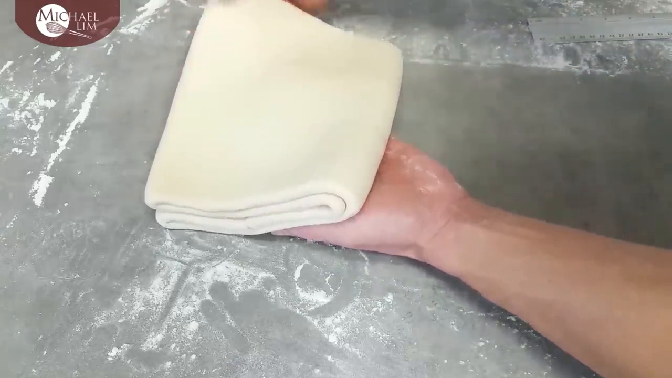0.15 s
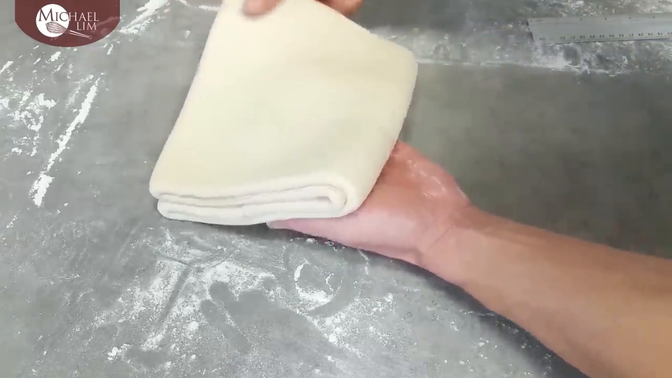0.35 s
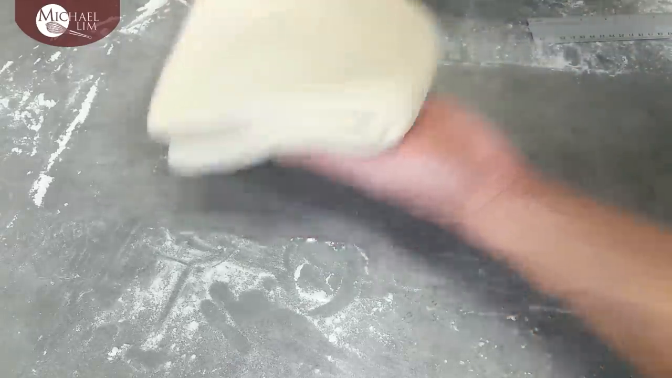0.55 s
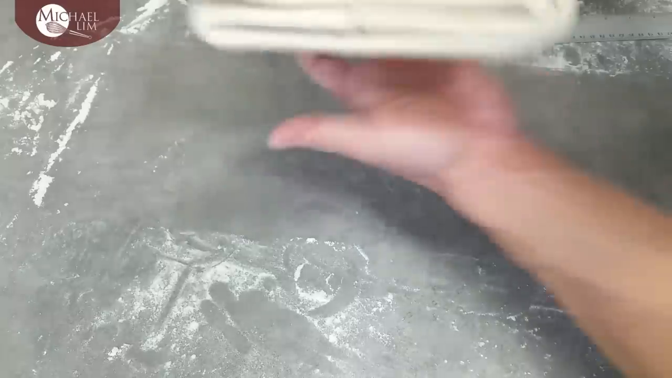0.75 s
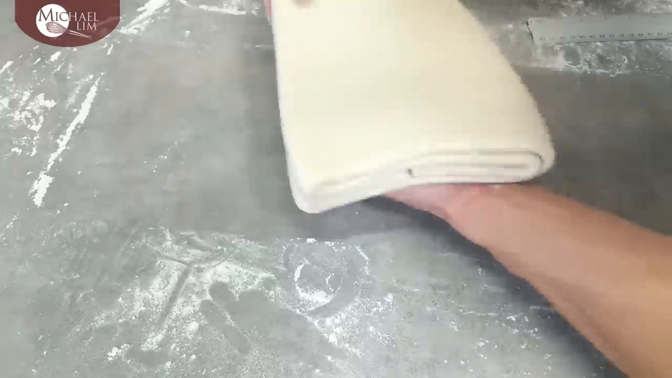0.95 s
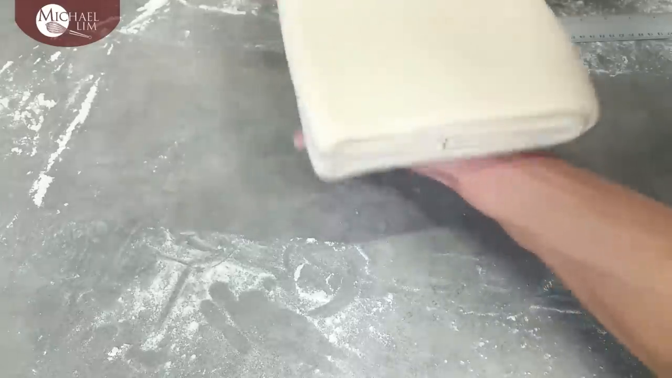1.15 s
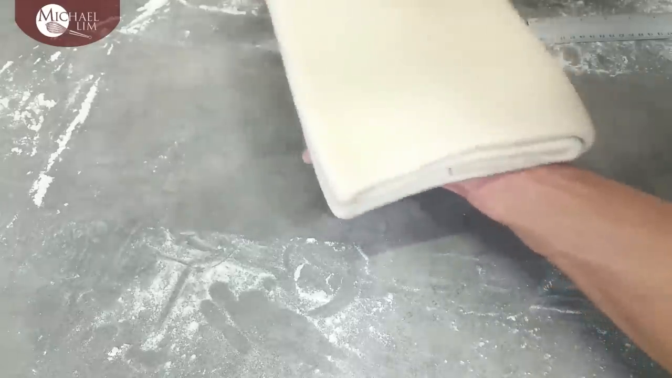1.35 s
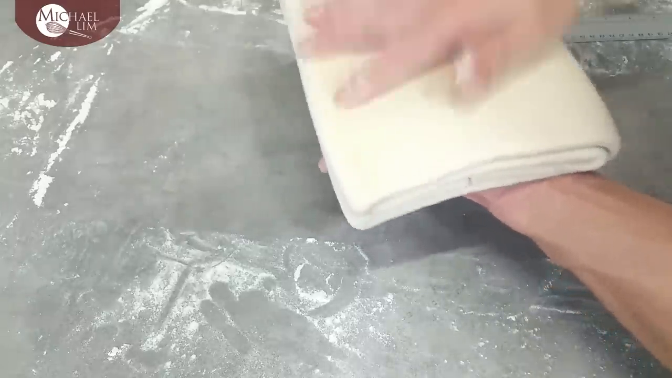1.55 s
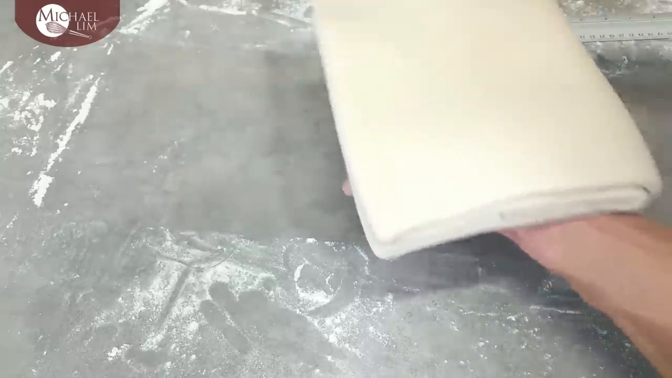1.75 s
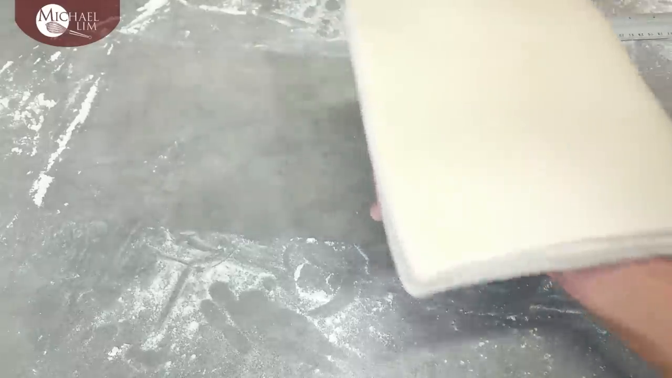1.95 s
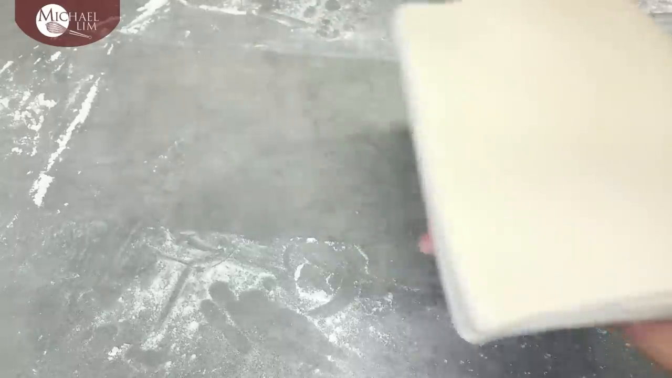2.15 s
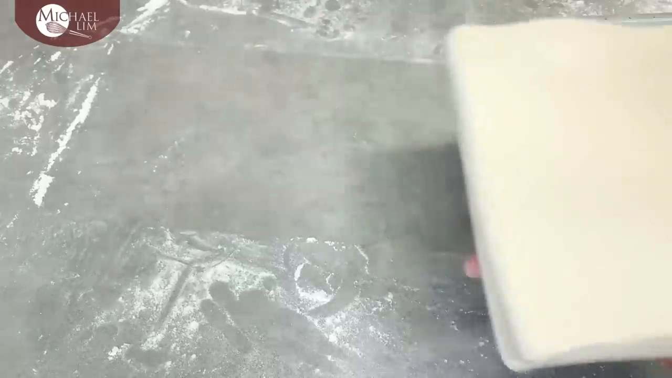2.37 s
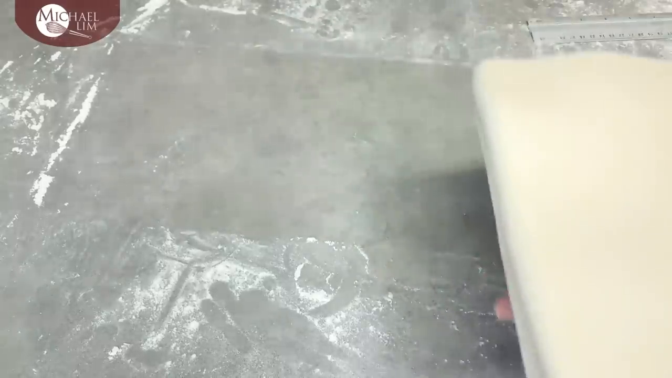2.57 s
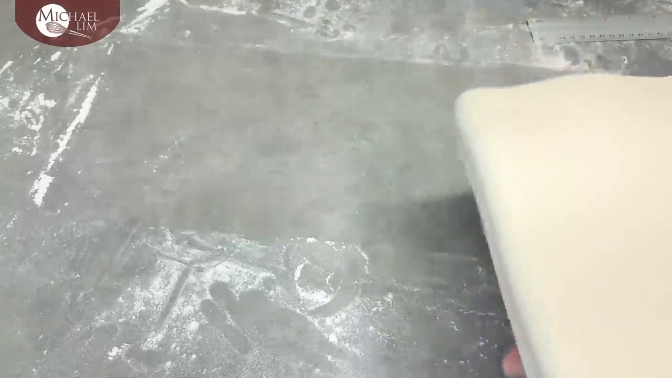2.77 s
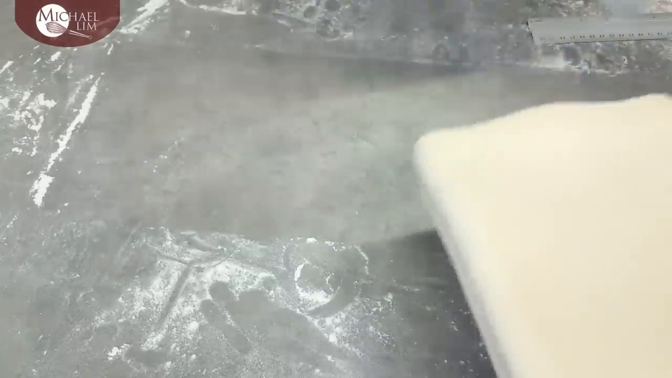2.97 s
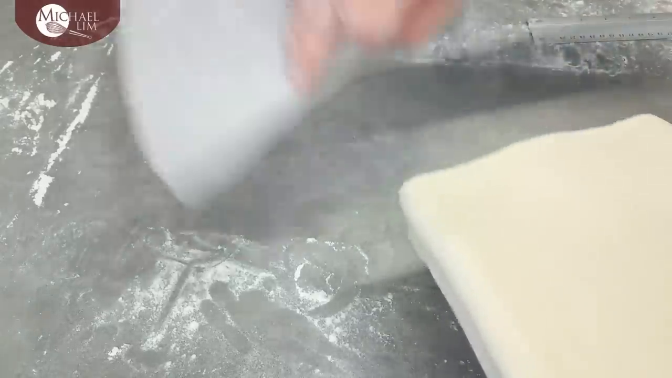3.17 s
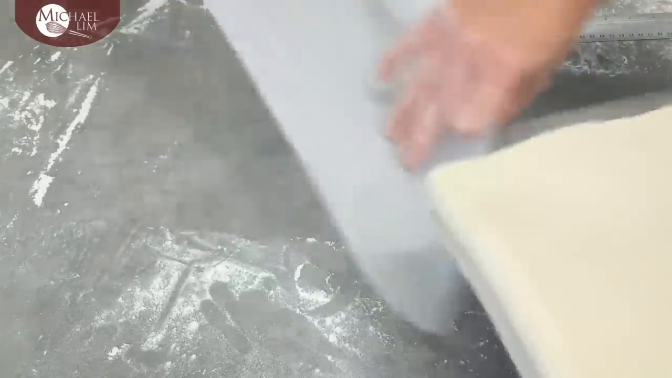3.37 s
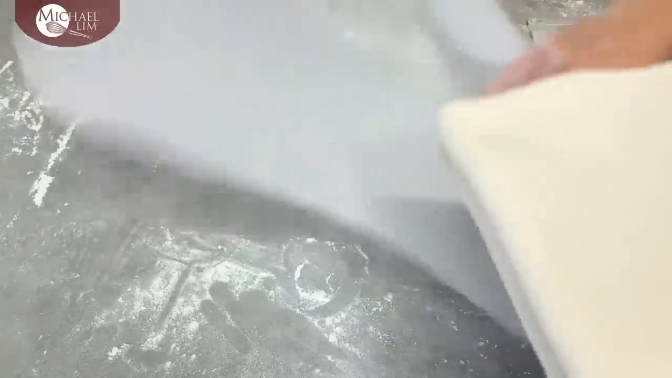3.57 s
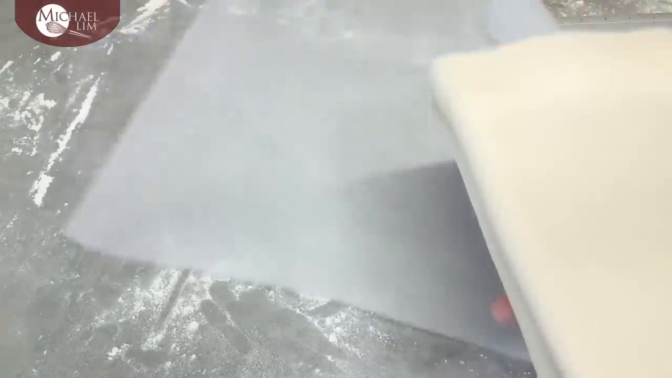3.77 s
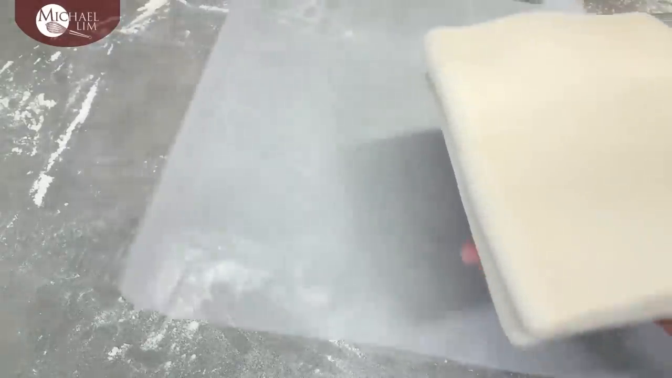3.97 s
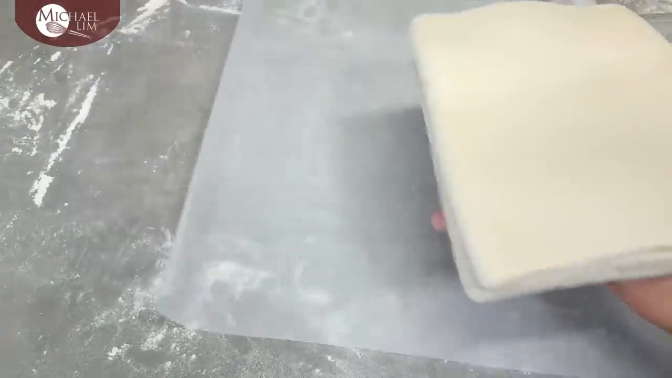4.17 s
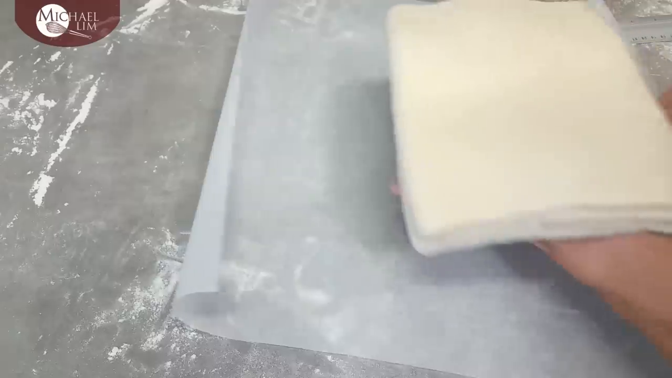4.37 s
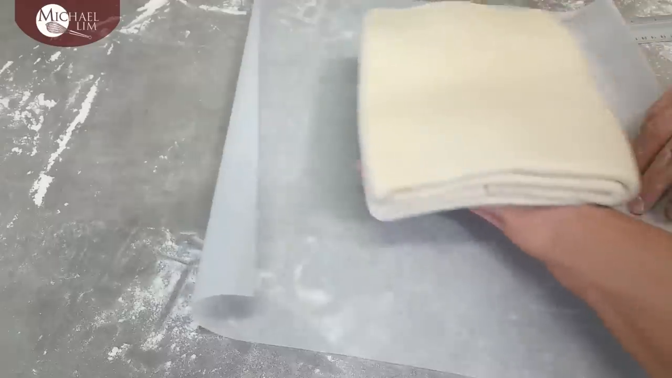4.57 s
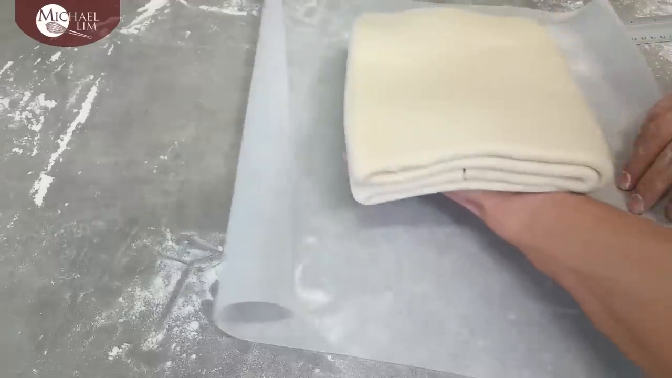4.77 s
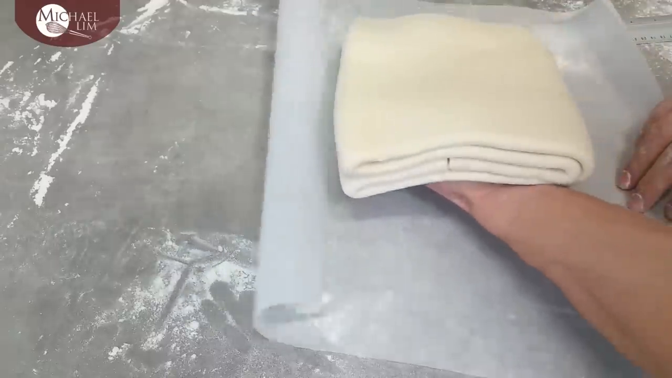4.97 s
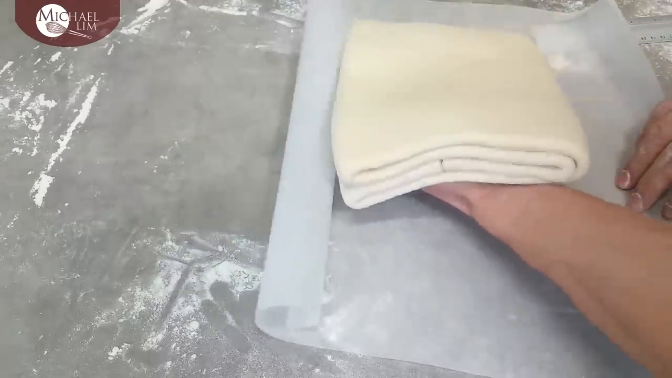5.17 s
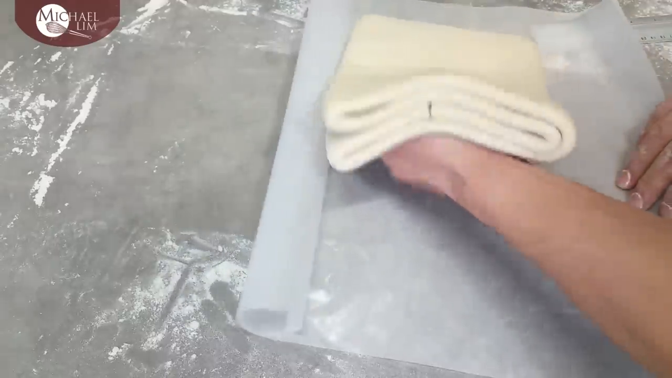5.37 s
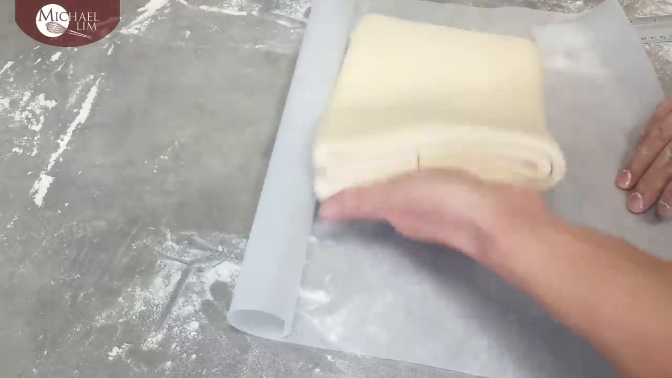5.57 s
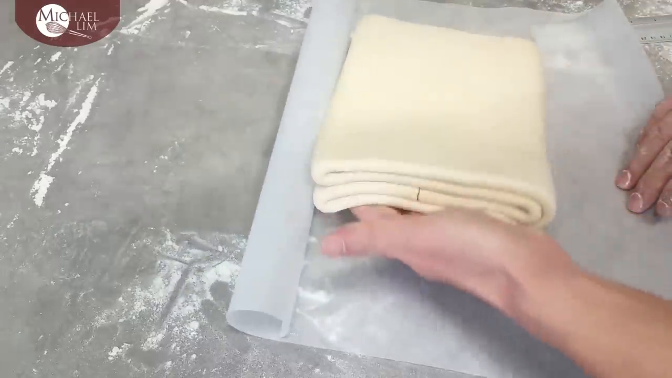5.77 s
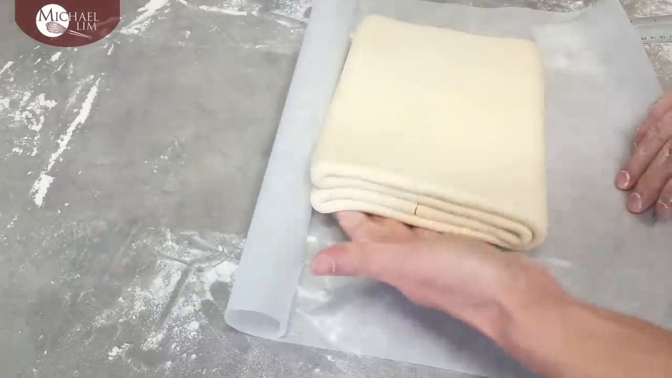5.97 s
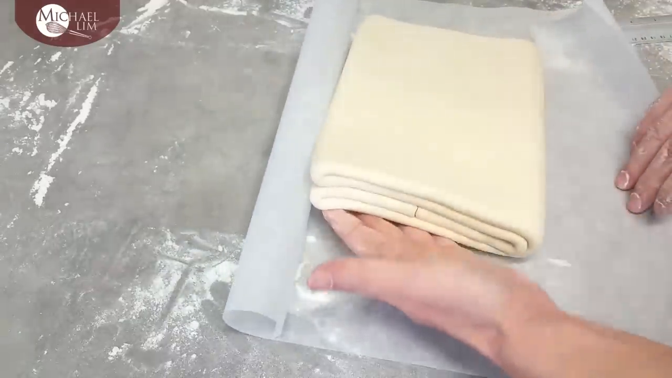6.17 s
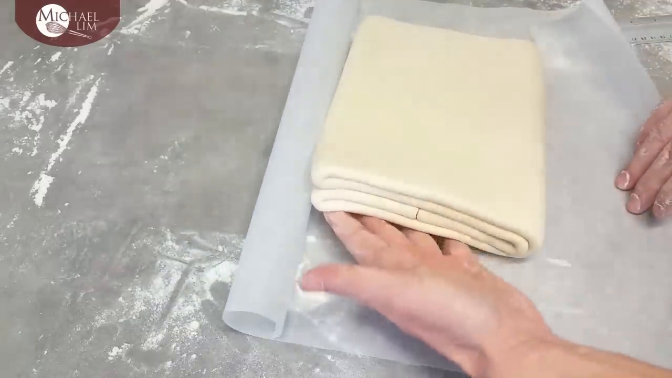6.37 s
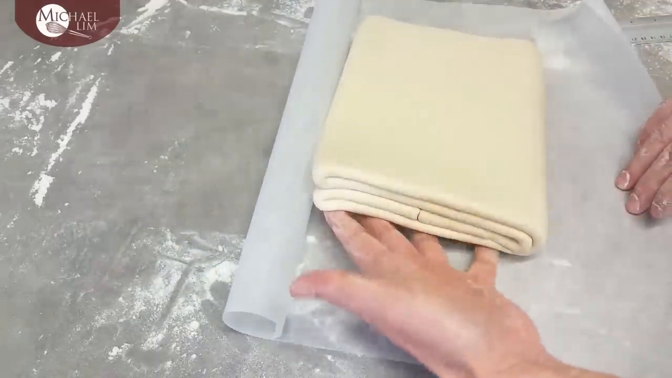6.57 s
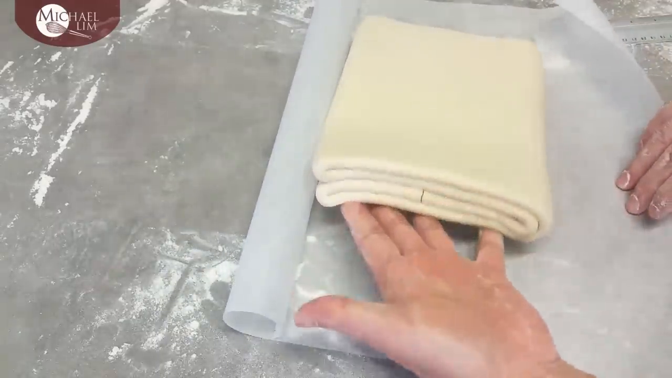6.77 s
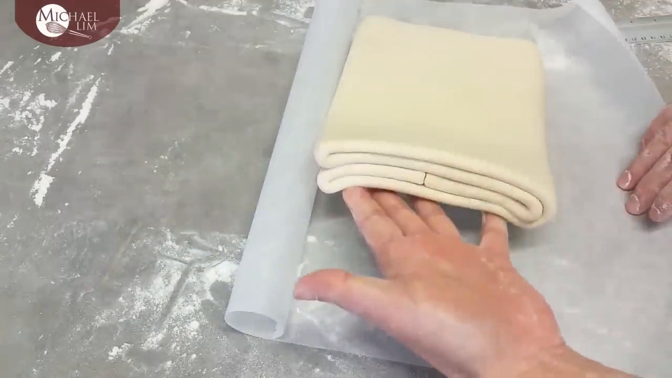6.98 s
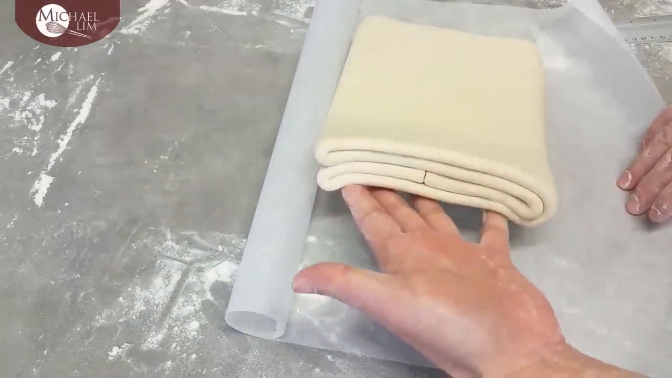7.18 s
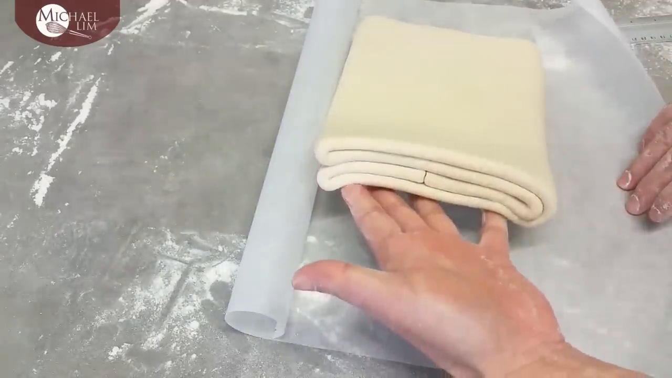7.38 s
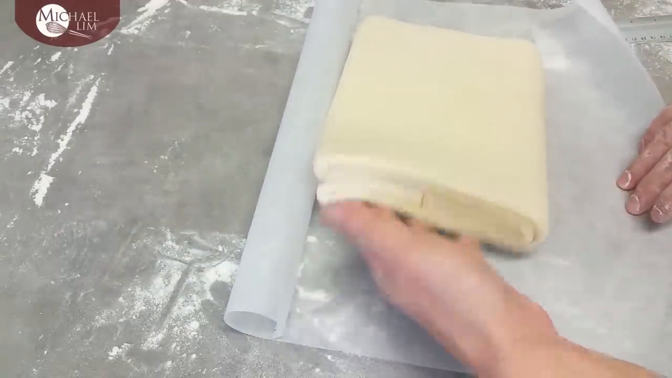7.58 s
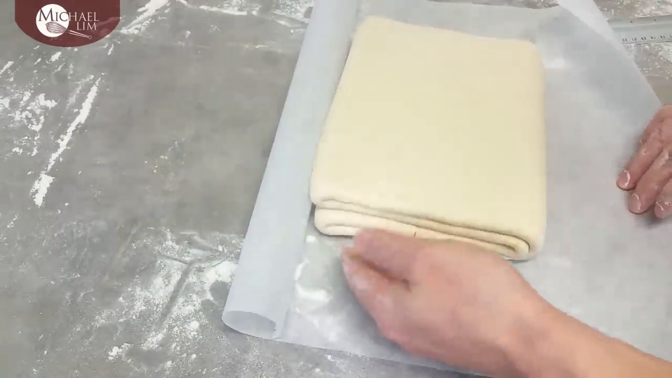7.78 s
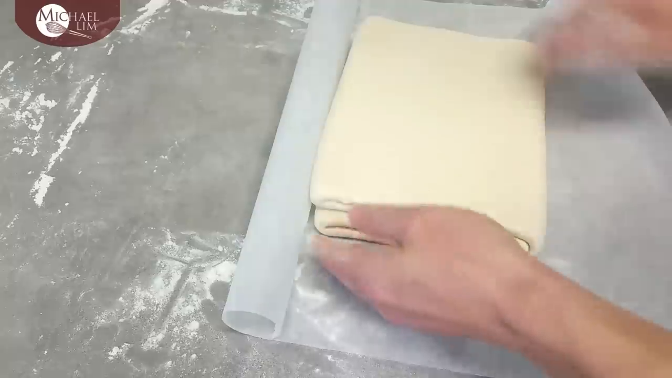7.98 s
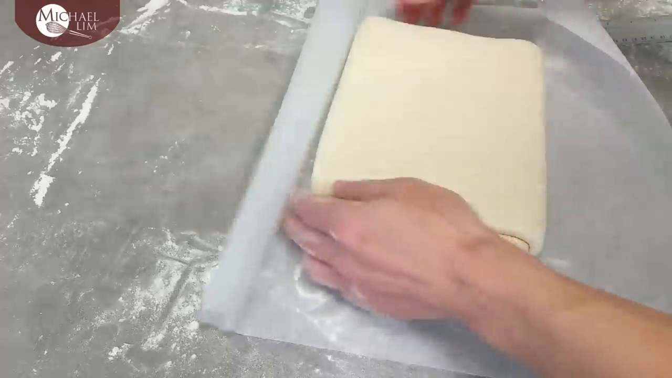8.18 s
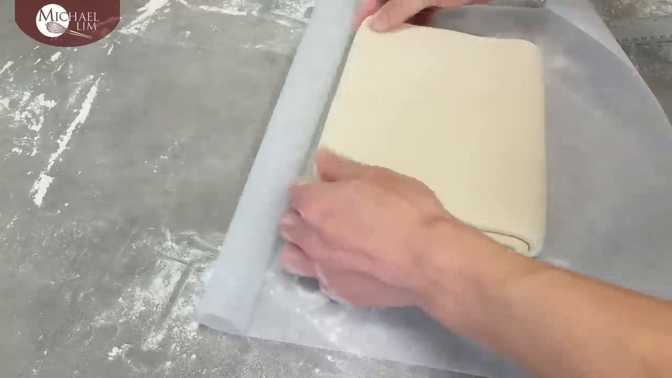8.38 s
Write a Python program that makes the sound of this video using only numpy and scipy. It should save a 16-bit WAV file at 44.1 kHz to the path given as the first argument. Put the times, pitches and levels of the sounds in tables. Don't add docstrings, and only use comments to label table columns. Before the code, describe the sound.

Close-up parchment paper snapped open and spread on a steel bench after a few dull dough pats, then gentle creasing and a final firm press.

```python
import sys
import numpy as np
from scipy import signal
from scipy.fft import rfft, irfft, next_fast_len
from scipy.io import wavfile

SR = 44100
rng = np.random.default_rng(int(sys.argv[2]) if len(sys.argv) > 2 else 0)


def gain_from_decibels(decibels):
    exponent = np.asarray(decibels, float) / 20
    return 10 ** exponent


def persist_wave(psi):
    counts = np.round(np.clip(psi, -1, 1) * 32767).astype(np.int16)
    wavfile.write(sys.argv[1], SR, np.atleast_2d(counts).T)


N = 371763

LEFT_LAG_S, LAG_SPREAD_S = .0003, .0002

# peak [t/s], rise [t/s], fall [t/s],
# force [level/dB], crispness [level/dB]. First the bare dough
DOUGH_TURNS = [
    (0.0, 0.057, 0.09, -61, -18),
    (.11, 0.052, 1, -64.5, -17),
    (1.0, 0.1, 0.15, -54.5, -4.5),
    (1.34, 0.11, 0.14, -59, -2.5),
    (1.42, .1, 0.23, -66.5, 1),
    (1.681, 0.035, 0.045, -60.5, -10),
    (1.74, 0.097, 0.084, -71, 14.5),
]
SHEET_FLAPS = [(2.284, 0.016, .11, -39, -1.5), (2.35, 0.084, 0.51, -33.5, -1), (2.5, 0.39, .15, -37, -6.5),
               (2.555, 0.059, .1, -32.5, 0), (2.585, 0.063, 0.1, -32.5, 0), (2.63, 0.11, 0.12, -30, 1.5),
               (2.753, 0.12, 0.48, -27.5, -1.5), (2.941, 0.085, 0.23, -30, -3),
               (3.099, 0.042, 0.15, -35, -2.5), (3.34, 0.075, 0.32, -43, 0.5),
               (3.47, 0.11, 0.32, -47.5, -5.5), (3.538, 0.023, 0.025, -37, -3),
               (3.56, 0.033, 0.067, -43, -6), (3.639, 0.13, 0.37, -35.5, -3), (3.87, .11, 0.23, -69, -10),
               (3.96, 0.096, 0.18, -47.5, 3), (4.074, 0.17, 0.13, -44, 3), (4.239, 0.054, 0.12, -44, 1),
               (4.51, 0.066, 0.03, -61, -7), (4.478, 0.67, 0.32, -56, 2.5)]
SHEET_PRESSES = [(4.83, 0.081, 0.23, -66, -3), (5.012, 0.025, .06, -45, -28), (5.05, 0.29, 0.31, -64, -1.5),
                 (5.14, 0.11, 0.99, -47, -8), (5.28, 0.3, 0.24, -52, -5), (5.47, 0.24, 0.41, -46.5, -4.5),
                 (5.57, 0.084, 0.17, -45.5, -4), (5.61, 0.091, 0.21, -43, -7.5),
                 (5.69, 0.18, 0.31, -55, 2.5), (6.04, 0.13, 0.18, -52, -6),
                 (6.13, 0.075, 0.23, -54.5, -4.5), (6.235, .08, 0.083, -54.5, -14),
                 (6.35, 0.067, 0.19, -62, -4.5), (6.58, 0.31, 0.4, -58.5, -1),
                 (7.782, 0.14, 0.25, -50.5, -10.5), (7.855, 0.15, 0.17, -52, -3.5),
                 (8.04, 0.15, 1, -53, -1), (8.24, 0.12, 0.5, -47, -3), (8.295, .04, 0.064, -46, -2),
                 (8.35, 0.035, .12, -44, -11), (8.401, 0.032, 0.14, -38.5, -3)]
# body, rustle, crispness, air [level/dB]
REST_LEVELS = [-65.5, -72, -75.5, -81.5]
LAYER_STEEPNESS = [.9, 1, 1.15, 1.35]
HANDLING_BEGINS = [0, 2.268, 4.7]


def effort():
    body_db, air_db = [7.5, -15, -17], [-4, -7.5, -3.5]
    body_per_crisp, air_per_crisp = 0.078, 1.32
    swell_db = 20
    t = np.arange(0, N + 64, 64) / SR
    power = gain_from_decibels(REST_LEVELS)[:, None] ** 2
    handling = [DOUGH_TURNS, SHEET_FLAPS, SHEET_PRESSES]
    for moves, begin, body, air in zip(handling, HANDLING_BEGINS, body_db, air_db):
        for s, rise, fall, db, crisp_db in moves:
            before = np.maximum((s - t) / max(rise, .005), 0) ** 1.6
            away = np.maximum(before, (t - s) / max(fall, .005))
            lean_db = [[body + body_per_crisp * crisp_db], [0], [crisp_db], [air + air_per_crisp * crisp_db]]
            level_db = db + np.array(lean_db) - swell_db * np.outer(LAYER_STEEPNESS, away)
            power = power + (t >= begin) * gain_from_decibels(level_db) ** 2
    return np.array([np.interp(np.arange(N) / SR, t, np.sqrt(p)) for p in power])


LAYER_HZ = [350, 1700, 5300, 11000]
# f/Hz, level/dB per Hz
PAPER_IN_AIR = [(71, -93), (120, -13), (355, 1.5), (402, -9.5), (513, -2), (892, 1.5), (1620, 4),
                (4140, 0.5), (6910, -15.5), (7820, -19), (11500, -8.5), (16000, -27.5)]
# f/Hz, level/dB per Hz
PAPER_ON_STEEL = [(180, -34), (300, 5), (405, -8.5), (900, -1.5), (978, 3), (1530, 0), (4090, -9.5),
                  (7690, -31.5), (12300, -27.5), (16000, -51)]


def rustle(per_s, uneven_db, hiss, ring_db, cycles):
    sizes = gain_from_decibels(uneven_db * np.minimum(rng.exponential(1, N), 4)) * rng.choice([-1, 1], N)
    clumps = gain_from_decibels(1.2 * drift(90))
    buckles = rms_one(sizes * (rng.random(N) < per_s * clumps / SR))

    pitches = np.geomspace(500, 9000, 28)
    dealt = rng.integers(0, 28, N // 500 + 1).repeat(500)[:N]
    patches = 0
    for k, hz in enumerate(pitches):
        patches = patches + ring(buckles * ((dealt - k) % 4 == 0), hz, cycles / hz) * np.sqrt(hz)
    right = buckles + hiss * rng.standard_normal(N) + gain_from_decibels(ring_db) * rms_one(patches)

    lags = np.round(SR * rng.normal(LEFT_LAG_S, LAG_SPREAD_S, N // 256 + 1)).astype(int)
    late = np.arange(N) - lags.repeat(256)[:N]
    pair = clumps * np.array([right[np.clip(late, 0, N - 1)], right])

    laid = round(5.4 * SR)
    levels, out = effort(), []
    for colour, span in [(PAPER_IN_AIR, slice(0, laid)), (PAPER_ON_STEEL, slice(laid, N))]:
        bands = split(pair[:, span], LAYER_HZ, colour)
        out.append(sum(rms_one(b) * level[span] for b, level in zip(bands, levels)))
    return np.hstack(out)


# t/s, peak level/dB, ring f/Hz, crispness level/dB. The sheet is pulled out and flapped
PULL_SNAPS = [(2.274, -24.5, 672, -18), (2.315, -20, 1600, -10), (2.345, -19.5, 1660, -5),
              (2.379, -36, 1680, -13), (2.395, -24, 1630, -3.5), (2.487, -26, 1120, -12),
              (2.545, -24.5, 2120, -5), (2.578, -18.5, 1090, -9), (2.607, -16, 1636, -10),
              (2.731, -15, 2300, -8.5), (2.812, -18.5, 1820, -9.5), (2.931, -21, 1710, -4),
              (3.208, -27.5, 2177, -14.5), (3.303, -30.5, 1750, -19), (3.331, -23, 1660, -13),
              (3.381, -40.5, 3800, 4.5)]
SPREAD_SNAPS = [(3.536, -47, 1580, -24), (3.598, -16.5, 2360, -11), (3.658, -48, 1240, -25),
                (3.688, -39, 3000, -36), (3.747, -25.5, 1720, -32), (3.809, -28.5, 1870, -35),
                (3.865, -38, 2260, -23.5), (3.959, -31, 2400, -9), (4.006, -29, 2560, -20),
                (4.043, -28.5, 2450, -24), (4.068, -23.5, 2490, -12.5), (4.204, -36, 3500, -27),
                (4.215, -24, 2270, -10.5), (4.395, -38.5, 1990, -17), (4.462, -37.5, 3400, -29),
                (4.472, -33.5, 2100, -23)]
LOWER_SNAPS = [(4.805, -45.5, 3210, -14), (4.917, -54, 1790, -24), (5.004, -34.5, 1370, -39),
               (5.067, -38, 1460, -28), (5.097, -41, 826, -22), (5.134, -34.5, 1470, -28),
               (5.287, -28, 1560, -20), (5.397, -36, 1700, -25), (5.491, -33.5, 1300, -12),
               (5.553, -29.5, 1540, -21), (5.647, -30, 2760, -17), (5.719, -38, 1110, -20),
               (5.785, -43, 1060, -24), (5.827, -45, 861, -33), (5.882, -51, 1530, -8.5),
               (6.12, -38, 1850, -20), (6.228, -44, 1140, -27), (6.345, -47, 1330, -25),
               (6.526, -43, 1500, -12), (6.576, -39, 1350, -14), (6.667, -41, 1970, -36),
               (6.851, -52, 1060, -31)]
TUCK_SNAPS = [
    (7.708, -55, 880, -25),
    (7.762, -60, 1030, -26),
    (7.968, -46, 1650, -23),
    (8.026, -36.5, 1655, -23),
    (8.222, -34, 1990, -28),
    (8.278, -29, 1900, -30),
    (8.336, -29, 1630, -37),
    (8.393, -30, 1260, -34),
]
DEEP_FOLDS = [
    (2.609, -14, 730, -30),
    (3.34, -22, 1180, -36),
    (5.01, -34, 1290, -34),
    (5.287, -30, 1020, -33),
    (5.292, -30, 887, -23),
    (7.766, -30.5, 1020, -34),
    (8.396, -24, 1180, -41),
]
DRY_TICKS = [
    (0.1156, -48, 1410, -22),
    (1.015, -37, 1460, -26),
    (1.68, -44, 1840, -25),
    (2.745, -27, 2240, -27),
    (3.5364, -26, 1520, -20),
    (3.869, -27, 2170, -17),
    (3.9609, -24, 2230, -24),
    (4.0653, -22.5, 2320, -20),
    (6.851, -52, 1044, -31),
    (7.764, -39, 1590, -30),
]


def snaps(crack_db, width, rise_s):
    tables = [PULL_SNAPS, SPREAD_SNAPS, LOWER_SNAPS, TUCK_SNAPS, DEEP_FOLDS, DRY_TICKS]
    t60s = [0.053, 0.094, 0.052, 0.12, 0.027, 0.0096]   # s, per table, at 1700 Hz
    out, t = np.zeros((2, N + SR)), np.arange(SR // 6) / SR
    rows = [(*row, t60) for table, t60 in zip(tables, t60s) for row in table]
    noise = rng.standard_normal((len(rows), len(t)))
    lags = rng.normal(LEFT_LAG_S, LAG_SPREAD_S, len(rows))
    for (s, db, hz, crisp_db, t60), white, lag in zip(rows, noise, lags):
        fall = gain_from_decibels(-60 * t / (t60 * (hz / 1700) ** -0.18))
        swell = white * fall * np.minimum(t / rise_s, 1)
        patch = rms_one(band(swell, hz / 1.58, hz * width)) + .5 * rms_one(ring(swell, hz, 35.0 / hz))
        crack = band((white + 1.3 * (t == 0)) * fall * gain_from_decibels(-1500 * t), 1800, 10400)
        crack = gain_from_decibels(crisp_db + crack_db) * crack / np.abs(crack).max()
        add(out, gain_from_decibels(db) * (rms_one(patch) * np.std(fall) + crack), s, lag)
    return out[:, :N]


# t/s, peak level/dB, ring f/Hz
BUCKLES = [(0.115, -40, 1010), (0.948, -42, 1780), (0.963, -25, 1250), (1.014, -40, 907),
           (1.314, -53, 1060), (1.68, -46, 1840), (2.325, -18.5, 1670), (2.382, -26, 1770),
           (2.394, -20, 1590), (2.578, -16.5, 1080), (2.606, -9, 3020), (2.615, -12, 1680),
           (2.639, -19, 2930), (2.711, -19, 2060), (2.729, -21, 2290), (2.738, -16, 1150),
           (2.75, -15, 2510), (2.771, -21, 2600), (2.795, -22, 1300), (2.883, -14.5, 2970),
           (2.935, -21, 1900), (2.965, -23, 1580), (3.329, -28, 1720), (3.382, -25, 4790),
           (3.451, -42, 2400), (3.538, -26, 1450), (3.608, -13, 2450), (3.687, -21, 2930),
           (3.711, -22, 3100), (3.868, -27, 2190), (3.918, -37, 2020), (4.205, -27, 3520),
           (4.216, -30, 1600), (4.396, -43, 2010), (4.446, -36, 4400), (4.461, -34, 3430),
           (4.475, -33.5, 1910), (4.806, -40, 3210), (4.986, -47, 1450), (5.014, -37, 1540),
           (5.188, -32, 1830), (5.235, -34.5, 1370), (5.287, -32, 1500), (5.294, -26, 1260),
           (5.3, -36, 926), (5.556, -30, 1610), (5.585, -27, 1050), (5.648, -37, 2680),
           (5.722, -33.5, 1150), (6.033, -42, 1140), (6.667, -43, 2020), (6.851, -49, 1040),
           (7.741, -42, 1110), (7.769, -30.5, 1590), (7.885, -39, 2200), (8.277, -28, 1830),
           (8.292, -37, 1290), (8.392, -31, 1280), (8.397, -33, 1100)]


def cracks(crack_db, cycles, bright_db, echo_s):
    out, click = np.zeros((2, N + SR)), np.zeros(SR // 40)
    click[[0, round(echo_s * SR), round(2.6 * echo_s * SR)]] = 1, -.6, .4
    bright = band(click, 2500, 15000)
    bright = gain_from_decibels(bright_db) * bright / np.abs(bright).max()
    for s, db, hz in BUCKLES:
        body = band(ring(click, hz, cycles / hz), hz / 2, hz * 2)
        add(out, gain_from_decibels(db + crack_db) * (body / np.abs(body).max() + bright), s, lag_s=.00006)
    return out[:, :N]


# t/s, peak level/dB, slap level/dB re thud, t60 [t/s]
HAND_PATS = [(0.115, -44.5, 3, 0.0066), (0.165, -62, 7, 0.013), (0.939, -46, -2, 0.016),
             (0.948, -49, -5, 0.006), (0.959, -23.5, 3, 0.012), (0.964, -21.5, 2, 0.0039),
             (1.015, -35, 7.5, 0.008), (1.313, -33.5, -1, 0.0074), (1.338, -38, -6, 0.004),
             (1.68, -45, 1.5, 0.0097), (2.221, -48, -32, 0.0084), (2.272, -32, -2, 0.0043),
             (3.595, -24, 9, 0.021), (8.33, -37.5, -9, 0.024)]
# f/Hz, level/dB, t60 [t/s]
DOUGH_MODES = [(276, 2.5, 0.15), (366, 1, 0.078), (542, 11, 0.096), (914, 1, 0.11), (1260, 0.5, 0.011),
               (1750, -1.5, 0.019)]


def pats(thud_db):
    out, t = np.zeros((2, N + SR)), np.arange(SR // 4) / SR
    noise = rng.standard_normal((len(HAND_PATS), len(t)))
    strengths = rng.normal(0, 2, (len(HAND_PATS), len(DOUGH_MODES)))
    for (s, db, slap_db, t60), white, own in zip(HAND_PATS, noise, strengths):
        push = white * gain_from_decibels(-60 * t / np.clip(t60, .002, .2))
        thud = 0
        for (hz, level, ring_s), own_db in zip(DOUGH_MODES, own):
            thud = thud + gain_from_decibels(level + own_db) * ring(push, hz, np.clip(ring_s, .005, .045))
        thud = band(thud, 190, 6000)
        slap = band(.15 * white * gain_from_decibels(-9000 * t) + (t == 0), 500, 2300)
        blow = thud / np.abs(thud).max() + gain_from_decibels(slap_db) * slap / np.abs(slap).max()
        add(out, gain_from_decibels(db + thud_db) * blow, s, lag_s=.0001)
    return out[:, :N]


# on [t/s], off [t/s], f/Hz, width [f/Hz], level/dB
FINGER_DRAG = (1.705, 1.752, 1850, 200, -57)


def squeak():
    on, off, hz, width_hz, db = FINGER_DRAG
    t = np.arange(N) / SR
    gate = np.clip(np.minimum(t - on, off - t) / .005, 0, 1) * gain_from_decibels(1.5 * drift(30))
    return gain_from_decibels(db) * gate * rms_one(band(rng.standard_normal(N), hz - width_hz / 2, hz + width_hz / 2))


# t/s, peak level/dB
BENCH_THUMPS = [
    (0.96, -43),
    (2.323, -50),
    (8.33, -34),
]
# f/Hz, level/dB, t60 [t/s]
BENCH_MODES = [(111, -8, 0.16), (152, 0.5, 0.18), (192, 2, 0.14)]


def bench():
    clicks = np.zeros(N)
    for s, db in BENCH_THUMPS:
        clicks[round(s * SR)] = gain_from_decibels(db)
    push = np.convolve(clicks, np.hanning(90) / 44.5)[:N]
    return sum(gain_from_decibels(db - 11) * ring(push, hz, t60) for hz, db, t60 in BENCH_MODES)


# f/Hz, t60 [t/s]
KITCHEN_T60 = [(150, 0.16), (500, 0.14), (1500, 0.17), (4000, 0.14), (8000, 0.065), (14000, 0.17)]
ECHO_BANDS_HZ = [60, 140, 250, 400, 600, 850, 1200, 1700, 2500, 4000, 6500, 10000, 15000]
# f/Hz, correlation [ratio]
PORT_LIKENESS = [(60, 0.9), (180, 0.79), (550, 0.8), (1650, 0.8), (4970, 0.16), (15000, 0.23)]


def kitchen(x):
    out, delay = 0, round(0.0046 * SR)
    direct = split(x.mean(0), ECHO_BANDS_HZ)
    diffuse = split(rng.standard_normal((2, N)), ECHO_BANDS_HZ)
    for hz, sound, (mid, side) in zip(ECHO_BANDS_HZ, direct, diffuse):
        r = gain_from_decibels(-120 / (at_hz(KITCHEN_T60, hz) * SR))
        energy = signal.lfilter([1 - r], [1, -r], np.r_[np.zeros(delay), sound[:N - delay] ** 2])
        out = out + np.sqrt(energy / 2) * spread(rms_one(mid), rms_one(side), hz)
    return out


# on [t/s], off [t/s], level/dB
MOTOR_RUNS = [
    (.445, .547, -69),
    (1.41, 1.495, -71),
    (7.357, 7.455, -76),
]


def whine():
    t = np.arange(N) / SR
    gate = 0
    for on, off, db in MOTOR_RUNS:
        gate = gate + gain_from_decibels(db) * np.clip(np.minimum(t - on, off - t) / 0.0024, 0, 1)
    return gate * gain_from_decibels(8.3 * drift(40)) * np.sin(2 * np.pi * 11005 * t) * [[1], [0]]


# f/Hz, level/dB per Hz
FAN_SPECTRUM = [(12, -40), (20, 1), (86, -1), (123, 3), (319, -3), (527, -10), (574, -47), (624, -21),
                (802, -13), (923, -28), (1000, -50), (2320, -27), (6180, -50.5), (11800, -27),
                (13500, -28.5), (16000, -35)]
# t/s, level/dB
BUILDING_RUMBLE = [(0.0, -61), (1.36, -64), (1.83, -64.5), (2.96, -61.5), (4.81, -67.5), (7.44, -70.5),
                   (8.43, -65)]


def fans(patchy_db):
    rumble_db, = in_time(BUILDING_RUMBLE)
    edges_hz = 22 * 2 ** np.arange(0, 9.6, .5)
    white, out = rng.standard_normal((2, 2, N)), 0
    for k, (low, high) in enumerate(zip(edges_hz, edges_hz[1:])):
        mid, side = band(white[k % 2], low, high)
        hz = np.sqrt(low * high)
        follows = 1 if hz < 130 else 0.92 if hz < 5000 else 0
        wander = (rumble_db - rumble_db.mean()) * follows
        level = gain_from_decibels(at_hz(FAN_SPECTRUM, hz) + wander + patchy_db * drift(7.8))
        out = out + level * spread(mid, side, hz)
    return gain_from_decibels(-61.5) * rms_one(out)


# t/s, firing f/Hz, level/dB
ENGINE_PULL = [(0, 50.6, -81), (.4, 56, -68), (.75, 60, -71), (1.1, 63.1, -65), (1.45, 66.8, -64),
               (1.7, 70.5, -85), (2.2, 78.7, -70), (2.6, 70, -87.5), (3.1, 63.2, -60), (3.3, 52.5, -84),
               (4.2, 55, -73.5), (5.4, 59, -69), (6, 58.3, -81)]
# f/Hz, width [f/Hz], level/dB
HUM_TONES = [
    (98.2, 3, -73),
    (269, 12, -73.5),
    (896, 27, -76),
    (2390, 80, -82),
]


def drone():
    hz, db = in_time(ENGINE_PULL)
    level = np.sqrt(2) * gain_from_decibels(db + 1.5 * drift(3.9))
    out = level * np.sin(2 * np.pi * np.cumsum(hz * (1 + 0.016 * drift(1.4))) / SR)
    white = rng.standard_normal(N)
    for tone_hz, width_hz, tone_db in HUM_TONES:
        out = out + gain_from_decibels(tone_db) * rms_one(ring(white, tone_hz, np.log(1000) / np.pi / width_hz))
    return out


# f/Hz, level/dB
BENCH_BALANCE = [(60, -4), (92, 15), (140, -2.5), (210, 0), (330, -0.5), (500, -2), (770, 2), (1170, 1.5),
                 (1790, 3), (2740, 1), (4190, 5.5), (6410, -16.5), (9810, 2.5), (15000, 4)]
# f/Hz, level/dB
DIFFUSE_BALANCE = [(60, 4), (130, 1.5), (290, 2), (640, -7), (1410, -4), (3100, 33.5), (6820, 17.5),
                   (15000, 9.5)]


def ports(x, balance):
    size = next_fast_len(N)
    lean = at_hz(balance, np.maximum(np.fft.rfftfreq(size, 1 / SR), 1)) / 2
    return irfft(rfft(x, size) * gain_from_decibels([lean, -lean]), size)[:, :N]


def spread(mid, side, hz):
    alike = np.clip(at_hz(PORT_LIKENESS, hz), 0, 1)
    return np.sqrt(1 + alike) * mid + np.sqrt(1 - alike) * side * [[1], [-1]]


def add(out, sound, s, lag_s):
    for port, at in enumerate([round((s + lag_s) * SR), round(s * SR)]):
        out[port, at:at + len(sound)] += sound


def rms_one(x):
    return x / np.sqrt(np.mean(x ** 2) + 1e-20)


def in_time(rows):
    s, *columns = np.transpose(rows)
    return [np.interp(np.arange(N) / SR, s, c) for c in columns]


def at_hz(points, hz):
    points = np.array(points)
    return np.interp(np.log(hz), np.log(points[:, 0]), points[:, 1])


def drift(rate):
    r = np.exp(-80 * np.pi * rate / SR)
    slow = signal.lfilter([1], [1, -2 * r, r * r], rng.standard_normal(N // 40 + 2002))[2000:]
    return np.interp(np.arange(N) / 40, np.arange(len(slow)), rms_one(slow))


def band(x, low_hz, high_hz):
    sos = signal.butter(2, [low_hz, min(high_hz, .45 * SR)], "band", fs=SR, output="sos")
    return signal.sosfilt(sos, x)


def ring(x, hz, t60):
    r, w = gain_from_decibels(-60 / (t60 * SR)), 2 * np.pi * hz / SR
    return signal.lfilter([0, np.sin(w)], [1, -2 * r * np.cos(w), r * r], x + 1e-18)


def split(x, centres_hz, colour=None):
    size = next_fast_len(x.shape[-1])
    hz = np.maximum(np.fft.rfftfreq(size, 1 / SR), 1)
    spectrum = rfft(x, size) * (gain_from_decibels(at_hz(colour, hz)) if colour else 1)
    shares = [np.interp(np.log(hz), np.log(centres_hz), one) for one in np.eye(len(centres_hz))]
    return [irfft(spectrum * share, size)[..., :x.shape[-1]] for share in shares]


def scene():
    sheet = gain_from_decibels(-3.5) * rustle(per_s=5000, uneven_db=3.0, hiss=0.85, ring_db=-12.5, cycles=34.0)
    sheet = sheet + squeak()
    creases = gain_from_decibels(-6.0) * snaps(crack_db=13.5, width=1.73, rise_s=0.00018)
    creases = creases + cracks(crack_db=-4, cycles=10, bright_db=-6.0, echo_s=.0011)
    hands = pats(thud_db=-3.0)
    echoes = kitchen(gain_from_decibels(-1.0) * sheet + gain_from_decibels(-2.0) * creases + gain_from_decibels(-4.0) * hands)
    near = ports(sheet + creases + hands + echoes, BENCH_BALANCE)
    around = ports(fans(patchy_db=.5), DIFFUSE_BALANCE)
    boom = bench() * gain_from_decibels([[2.5], [-4]])
    return near + around + whine() + drone() + boom


def roll_off(x):
    return signal.sosfilt(signal.butter(12, 16310, fs=SR, output="sos"), x)


def record(dry):
    low_pass = signal.cheby2(16, 70, 16250, fs=SR, output="sos")
    return roll_off(signal.sosfilt(low_pass, dry))


dry = scene()
out = record(dry)
persist_wave(out)
```